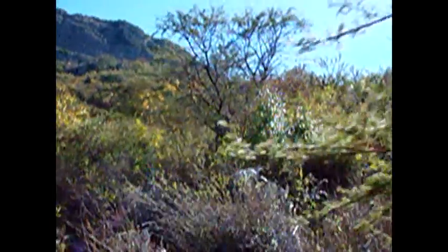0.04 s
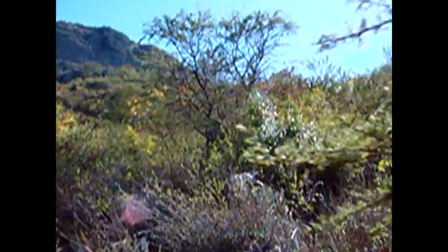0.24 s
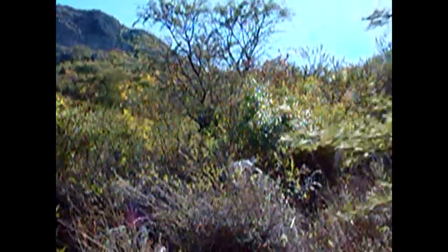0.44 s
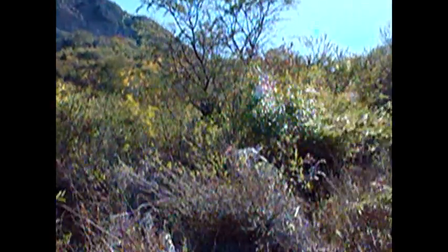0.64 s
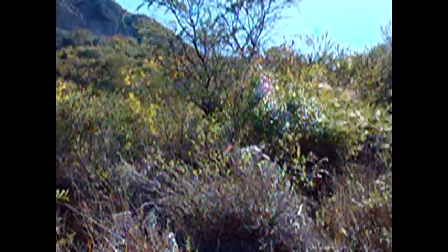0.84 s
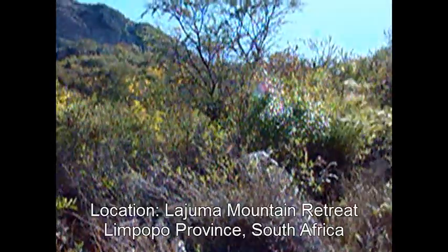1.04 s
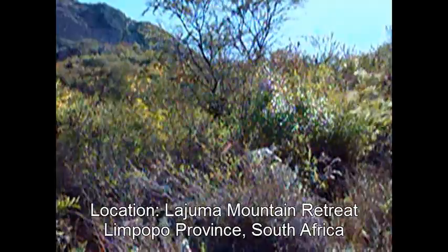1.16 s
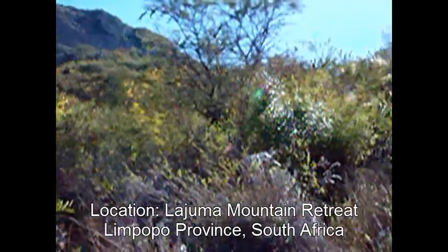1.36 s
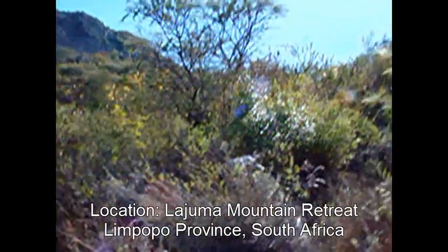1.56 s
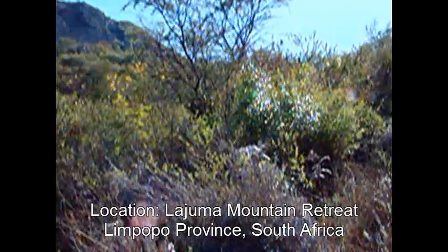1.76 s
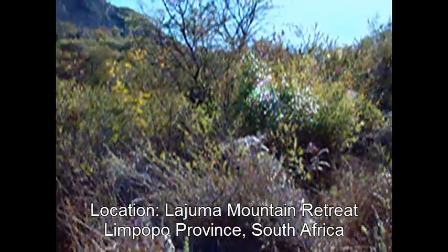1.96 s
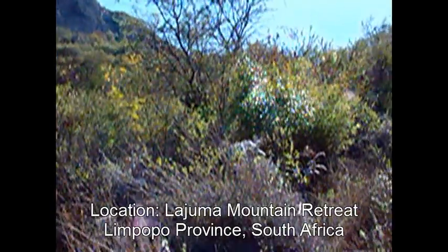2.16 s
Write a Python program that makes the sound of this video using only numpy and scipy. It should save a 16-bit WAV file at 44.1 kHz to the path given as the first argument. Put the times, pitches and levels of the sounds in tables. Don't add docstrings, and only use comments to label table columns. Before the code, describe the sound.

A young hoofed animal gives one loud buzzy bleating cry, then twigs and dry leaves rustle

```python
import sys
import numpy as np
from scipy import signal
from scipy.io import wavfile
from scipy.ndimage import uniform_filter1d

SR = 44100
rng = np.random.default_rng(int(sys.argv[2]) if len(sys.argv) > 2 else 0)


def voltage_ratio(decibels):
    exponent = np.asarray(decibels, float) / 20
    return 10 ** exponent


def to_wav(sig):
    pcm = np.clip(np.atleast_2d(sig), -1, 1) * 32767
    pcm = np.round(pcm).astype(np.int16)
    wavfile.write(sys.argv[1], SR, pcm.T)


N = 97108


def evened(x):
    return x / np.sqrt(np.mean(x ** 2) + 1e-20)


def read(points, hz):
    f, value = np.transpose(points)
    return np.interp(np.log(hz + 1), np.log(f + 1), value)


def add(mix, s, sound):
    part = mix[round(s * SR):][:len(sound)]
    part += sound[:len(part)]


def bump(t, centre_s, half_s):
    return np.exp(-((t - centre_s) / half_s) ** 2)


def high_pass(x, hz):
    return signal.sosfilt(signal.butter(2, hz, "high", fs=SR, output="sos"), x)


def slow(size, rate_hz):
    low_pass = signal.butter(2, rate_hz, fs=SR, output="sos")
    return evened(signal.sosfilt(low_pass, rng.standard_normal(size + SR))[SR:])


def resonate(x, hz, width):
    turn = np.exp(2j * np.pi * np.cumsum(hz * np.ones(len(x))) / SR)
    r = np.exp(-np.pi * width / SR)
    smoothed = signal.lfilter([(1 - r) ** 2], [1, -2 * r, r * r], x / turn + 1e-18)
    return 2 * (turn * smoothed).real


def voice_pitch(t):
    # start_s, pitch_hz
    pitch_points = [(.116, 248), (0.174, 232), (0.227, 229.4), (0.285, 236.7), (0.311, 234.5),
                    (0.499, 243.7), (0.63, 236.6), (0.726, 224.6), (0.852, 219.5)]
    scoop_hz, scoop_bend, sag_hz_per_s = 66.15, 1.4, 680
    s, hz = np.transpose(pitch_points)
    scoop = scoop_hz * np.maximum(1 - t / s[0], 0) ** scoop_bend
    sag = sag_hz_per_s * np.clip(t - s[-1], 0, .08)
    catch = 10.08 * bump(t, .244, 0.01519)
    return np.interp(t, s, hz) - scoop - sag - catch, s[-1]


def fold_pulses(turns):
    patchy_db, patchy_hz, smear, shimmer_db = 2.2, 18, .006, 1.2
    pulses = np.zeros(SR)
    for k in range(3, 42):
        swell = voltage_ratio(patchy_db * min(k / 12, 1) * slow(SR, patchy_hz))
        pulses += swell * np.cos(2 * np.pi * (k * turns + smear * k * k))
    return evened(pulses * voltage_ratio(shimmer_db * slow(SR, 180)))


def cry():
    # start_s, level_db, mouth_opening (0-1), effort_db (lifts upper resonances), hoarseness (factor)
    course = [(0, -36.5, 0.9, -13.5, 1.5), (.06, -25, 0.63, -9.5, 0.93), (.12, -25.5, 0.67, 1, 1.23),
              (.24, -23, 0.4, -11.5, 1.2), (.3, -24.5, 0.42, -6, 1.23), (.4, -25.5, 0.27, -5.5, 1.43),
              (.63, -22.5, 0.15, -5.5, 1.08), (.76, -22.5, 0.36, -5.5, 0.86), (.86, -22.5, 0.38, -10, 2.4)]
    # narrow_mouth_hz, wide_mouth_hz, width_hz, narrow_mouth_db, wide_mouth_db
    resonances = [(1336, 1367, 120, 2, 0.5), (1765, 1846, 390, -13.5, -10.5), (2445, 2680, 550, -13, -6),
                  (2823, 3050, 186, 4, -7), (3460, 3220, 830, -19.5, -3.5), (4500, 4780, 735, -1.5, -22.5),
                  (5363, 5980, 780, -1, -7.5), (7800, 8220, 1010, -19, -13)]
    # pitch_hz, width_hz, level_db
    chest = (1200, 260, -12)
    # pitch_hz, width_hz, level_db
    nose = (828, 200, -22)
    # pitch_hz, share (0-1)
    breath_share = [(1400, .07), (1900, .22), (2500, .45), (2900, .2), (3500, .5), (4500, .28), (5400, .52),
                    (8000, .55)]
    tremor, jitter, wander_db = .0035, .004, 1.6
    track, track_hz = 3.9, 228
    close_per_s = 4.4
    end_s, release_s = 0.866, 0.014

    t = np.arange(SR) / SR
    s, *columns = np.transpose(course)
    db, mouth, effort_db, hoarse = (np.interp(t, s, c) for c in columns)
    hz, jaw_shuts_s = voice_pitch(t)
    unsteady = 1 + tremor * slow(SR, 29.0) + jitter * slow(SR, 220)
    turns = np.cumsum(uniform_filter1d(hz, 600) * unsteady) / SR
    folds = fold_pulses(turns)
    puffs = evened((2.1 + np.exp(-(turns % 1) / 0.68)) * rng.standard_normal(SR))

    throat = voltage_ratio(nose[2]) * resonate(folds, nose[0], nose[1])
    throat -= voltage_ratio(chest[2]) * resonate(folds, chest[0], chest[1])
    choke_db = -7 * bump(t, 0.23, 0.027)
    tracking = track * (1 - mouth) * np.maximum(hz - track_hz, 0)
    jaw = 1 - close_per_s * np.clip(t - jaw_shuts_s, 0, .05)
    hoarse = np.clip(hoarse, .5, np.where(t < .8, 1.2, 3))
    for k, (narrow_hz, wide_hz, width, narrow_db, wide_db) in enumerate(resonances):
        breath = np.clip(read(breath_share, narrow_hz) * hoarse, 0, .9)
        source = (1 - breath) * folds + breath * puffs
        level_db = narrow_db + (wide_db - narrow_db) * mouth
        level_db = level_db + effort_db * min(max(k - 1, 0) / 4, 1) + wander_db * slow(SR, 6.0)
        centre_hz = narrow_hz + (wide_hz - narrow_hz) * mouth
        if k == 0:
            centre_hz = (centre_hz + tracking) * jaw
        if k == 3:
            level_db = level_db + choke_db
        throat += (-1) ** k * voltage_ratio(level_db) * resonate(source, centre_hz, width)
    throat = high_pass(throat, 550)
    throat /= np.sqrt(1e-12 + uniform_filter1d(throat ** 2, 2000))
    out = np.zeros(N)
    add(out, 0, throat * voltage_ratio(db) * np.exp(-np.maximum(t - end_s, 0) / release_s))
    return out


def slope(x):
    # pitch_hz, t60_s
    hillside_decay = [(700, 0.68), (1400, 0.81), (3000, 0.68), (7000, 0.62)]
    far_db, near_db, near_t60_s = -20, -13, .08
    t = np.arange(SR) / SR
    hz, u, z = signal.stft(rng.standard_normal(SR) * (t > .04), SR, nperseg=256)
    fade = voltage_ratio(-60 * u / read(hillside_decay, hz)[:, None])
    far = signal.istft(z * fade, SR, nperseg=256)[1][:SR]
    near = rng.standard_normal(SR) * voltage_ratio(-60 * t / near_t60_s) * (t > .003)
    tail = voltage_ratio(far_db) * far / np.linalg.norm(far) + voltage_ratio(near_db) * near / np.linalg.norm(near)
    return x + signal.fftconvolve(x, tail)[:N]


def knocks():
    # start_s, peak_db, pitch_hz, ring_t60_s
    knock_events = [(.114, -32.5, 556, 0.017), (.148, -34.5, 310, 0.017), (.27, -34.5, 423, 0.025),
                    (.279, -19.5, 1095, 0.011), (.284, -31, 860, 0.022), (.314, -32.5, 435, 0.014),
                    (1.7335, -33.5, 1640, 0.015), (1.5, -38.5, 834, 0.025), (1.053, -57, 527, 0.031),
                    (1.0615, -36.5, 700, 0.024), (1.067, -36, 880, 0.029), (1.071, -38.5, 452.4, 0.041),
                    (1.1315, -34.5, 670, 0.023), (1.135, -34, 523, 0.015), (1.1415, -20.5, 750, 0.0057),
                    (1.145, -28.5, 400, 0.02), (1.1545, -29.5, 596, 0.02), (1.158, -24.5, 640, 0.0083),
                    (1.165, -24, 800, 0.005), (1.168, -32, 450, 0.011), (1.178, -38, 780, .03),
                    (1.19, -39.5, 775, 0.046), (1.239, -38.5, 560, 0.034), (1.329, -42, 567, 0.04),
                    (1.43, -43.5, 698, 0.048), (1.502, -42.5, 412, 0.059), (1.521, -21, 643, 0.011),
                    (1.593, -32.5, 800, 0.027), (1.732, -52, 478, 0.097), (1.761, -33.5, 810, 0.0077),
                    (1.837, -34.5, 820, 0.013), (1.931, -29.5, 460, 0.0052)]
    crack_share, crack_ratio, crack_decay_s = 0.24, 2.03, 0.0036
    out, t = np.zeros(N), np.arange(4000) / SR
    for s, db, hz, t60 in knock_events:
        turn = 2 * np.pi * hz * t
        ring = np.sin(turn) + 0.72 * np.sin(1.238 * turn)
        ring += crack_share * np.sin(crack_ratio * turn) * np.exp(-t / crack_decay_s)
        add(out, s, voltage_ratio(db - 60 * t / t60) * ring * (1 - np.exp(-t / 0.00074)) * 1.66)
    return out


def leaves():
    # start_s, peak_db, centre_hz, length_s
    scratches = [(1.084, -58.5, 1980, 0.01), (1.157, -22.5, 8400, 0.007), (1.19, -21.5, 7500, 0.0062),
                 (1.235, -28.5, 7740, 0.0057), (1.155, -28, 8000, .005), (1.205, -25.5, 8100, .006),
                 (1.259, -27.5, 7400, 0.0052), (1.343, -43, 7700, .008), (1.359, -26, 8320, 0.009),
                 (1.375, -28, 7100, 0.0074), (0.029, -17, 8140, 0.0035), (0.267, -23.5, 8270, 0.014),
                 (0.316, -23, 8700, 0.011), (1.463, -54, 6900, 0.01), (1.496, -26, 7050, 0.018),
                 (1.592, -58, 2060, 0.006), (1.675, -48, 4430, 0.01), (1.731, -31.5, 1650, 0.0096),
                 (1.816, -36.5, 2440, 0.015), (1.915, -33.5, 7400, 0.019), (2.171, -31, 6640, 0.0097)]
    out, t = np.zeros(N), np.arange(5000) / SR
    for s, db, hz, length in scratches:
        noise = rng.standard_normal(5000)
        scratch = evened(resonate(noise * abs(noise), hz, 0.42 * hz)) + 0.17 * noise
        add(out, s, voltage_ratio(db - 14.0) * scratch * np.minimum(t / 0.00067, 1) * np.exp(-t / length))
    return out


def brushes():
    # centre_s, level_db, centre_hz,
    # half_length_s
    swells = [(0.304, -47, 875, 0.52), (0.89, -53, 850, 0.092), (1.197, -50.5, 880, 0.066),
              (0.104, -51.5, 8160, 0.082), (0.882, -40, 4500, 0.04), (1.223, -56.5, 7900, 0.02),
              (1.339, -48, 6750, 0.074), (1.54, -51, 7100, 0.014), (1.82, -50.5, 4160, 0.16),
              (1.98, -53, 7800, 0.013), (2.08, -52, 4970, 0.042)]
    squeak_s, squeak_half_s, squeak_db = 1.886, 0.014, -46.5
    squeak_hz, squeak_hz_per_s = 2570, 70000
    t, noise = np.arange(N) / SR, rng.standard_normal(N)
    out = np.zeros(N)
    for s, db, hz, half_s in swells:
        out += voltage_ratio(db) * bump(t, s, half_s) * evened(resonate(noise, hz, 0.79 * hz))
    hz = squeak_hz + squeak_hz_per_s * np.clip(t - squeak_s, -.03, .03)
    squeak = bump(t, squeak_s, squeak_half_s) * evened(resonate(noise, hz, 1000))
    return out + voltage_ratio(squeak_db) * squeak


def crunch():
    # time_s, level_db
    stirring = [(0, 3), (.3, -8.5), (.6, 2.5), (.93, 0), (1.02, 0), (1.22, 1), (1.42, 6.5), (1.661, -2),
                (1.76, 10.5), (1.95, -4.5), (2.1, 6), (2.2, 6)]
    level_db, grains_per_s = -53, 260
    t, out = np.arange(800) / SR, np.zeros(N)
    stir_db = np.interp(np.arange(N) / SR, *np.transpose(stirring))
    grain_db = 2.6 * np.minimum(rng.exponential(1, N), 4) + 1.6 * slow(N, 34) + stir_db
    size = voltage_ratio(grain_db) * (rng.random(N) < grains_per_s / SR)
    kind = rng.integers(0, 16, N)
    for k, hz in enumerate(np.geomspace(340, 1400, num=16)):
        grain = np.sin(2 * np.pi * hz * t) * t * hz * np.exp(-t * hz / 0.58)
        out += signal.oaconvolve(size * (kind == k), grain)[:N]
    return voltage_ratio(level_db) * evened(out)


def gusts():
    # centre_s, level_db, half_length_s
    wind_puffs = [(0.077, -47, 0.034), (0.152, -42, 0.022), (.21, -58.5, 0.029), (.41, -60, 0.068),
                  (1.152, -56, 0.014), (1.51, -64, 0.014)]
    t = np.arange(N) / SR
    shape = sum(voltage_ratio(db) * bump(t, s, half_s) for s, db, half_s in wind_puffs)
    rumble = resonate(resonate(rng.standard_normal(N), 150, 360), 150, 360)
    return shape * evened(rumble)


def air():
    # pitch_hz, level_db (per Hz)
    breeze = [(24, -70), (40, -51), (137, -71), (177, -8), (448, -3.5), (1160, -7.5), (5510, -14),
              (8570, -11), (10300, -19.5), (13400, -54), (22000, -120)]
    level_db, patch_db, flicker_db = -49, 0.74, 1.46
    frames, hz = N // 128 + 5, np.fft.rfftfreq(512, 1 / SR)
    a, b, patches = rng.standard_normal((frames, 257, 3)).T
    patches = evened(uniform_filter1d(uniform_filter1d(patches, 14, 0), 16, 1))
    flicker = evened(uniform_filter1d(rng.standard_normal(frames), 5))
    z = (a + 1j * b) * voltage_ratio(read(breeze, hz)[:, None] + patch_db * patches + flicker_db * flicker)
    return voltage_ratio(level_db) * evened(signal.istft(z, nperseg=512, noverlap=384)[1][:N])


def dropouts(x):
    # centre_s, centre_hz, half_length_s
    single_holes = [(0.026, 5600, .006), (.02, 7400, .006), (.02, 9330, .006), (0.036, 9300, .004),
                    (0.082, 8600, .002), (0.315, 9900, .01), (1.172, 8550, .003), (1.2, 9800, .004),
                    (1.504, 6600, .008), (1.454, 9300, .004), (1.143, 6450, .01), (1.141, 9300, .011),
                    (1.19, 6520, .005), (1.52, 6500, .005), (1.923, 6200, .008), (2.195, 6500, .006)]
    hole_share = .11
    hz, t, z = signal.stft(x, SR, nperseg=256)
    chance = hole_share * np.clip(np.arange(33) / 4 - .9, 0, 1)
    starved = rng.random((len(t) // 2 + 1, 33)) < chance
    holes = np.repeat(np.repeat(starved, 2, 0), 4, 1).T[:129, :len(t)]
    for s, f, half_s in single_holes:
        holes = holes | np.outer(abs(hz - f) < 900, abs(t - s) < half_s)
    return signal.istft(z * np.where(holes, voltage_ratio(-46), 1), SR, nperseg=256)[1][:N]


def channel_difference(mid):
    # centre_hz, half_width_hz, level_db
    wide_bands = [(1074, 434, -16), (4160, 500, -14), (4890, 420, -11)]
    hz, t, z = signal.stft(mid, SR, nperseg=1024)
    power = uniform_filter1d(abs(z) ** 2, 24, 0)
    open_share = [.9, .75, .45]
    gates = np.repeat(rng.random((len(t) // 3 + 1, 3)) < open_share, 3, 0)[:len(t)]
    mask = np.zeros(z.shape)
    for (f, half_hz, db), gate in zip(wide_bands, gates.T):
        mask += voltage_ratio(db) * np.outer(abs(hz - f) < half_hz, gate)
    chance_phase = np.exp(2j * np.pi * rng.random(z.shape))
    return signal.istft(np.sqrt(abs(power)) * mask * chance_phase, SR, nperseg=1024)[1][:N]


def scene():
    ground = high_pass(knocks() + crunch(), 150)
    mix = slope(cry()) + ground + leaves() + brushes() + gusts() + air()
    return np.array([mix, mix])


def roll_off(x):
    return signal.sosfilt(signal.butter(12, 10470, fs=SR, output="sos"), x)


def record(dry):
    band_limit = signal.firwin(255, 10400, window=("kaiser", 9), fs=SR)
    mid = signal.oaconvolve(dropouts(dry[0]), band_limit, "same")
    side = channel_difference(mid)
    return roll_off(np.array([mid + side, mid - side]))


dry = scene()
out = record(dry)
to_wav(out)
```